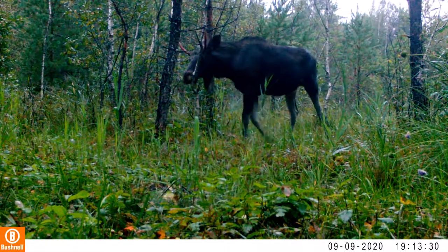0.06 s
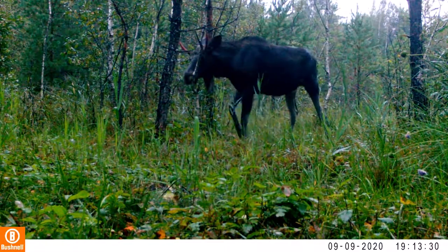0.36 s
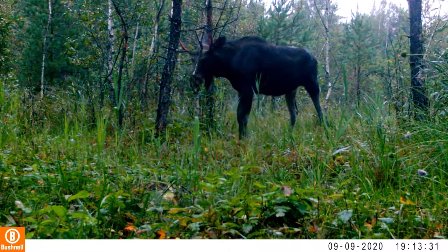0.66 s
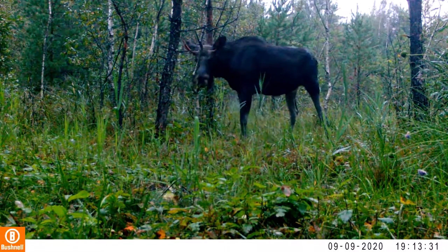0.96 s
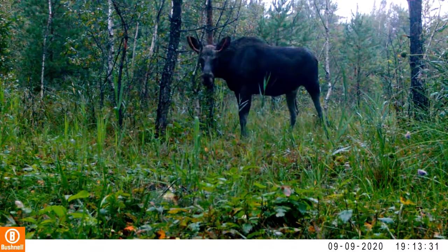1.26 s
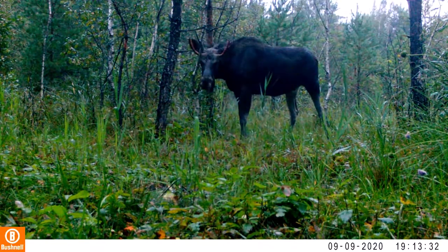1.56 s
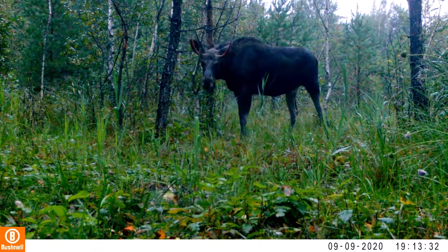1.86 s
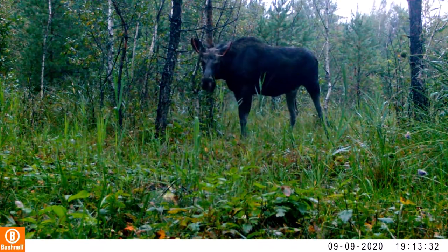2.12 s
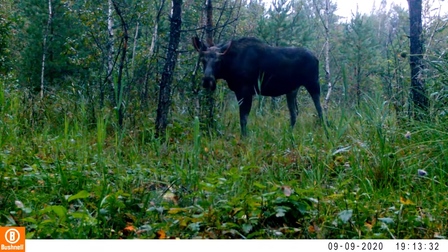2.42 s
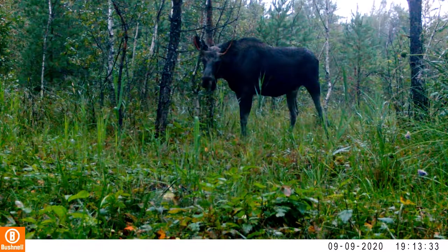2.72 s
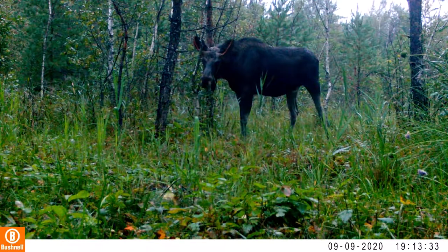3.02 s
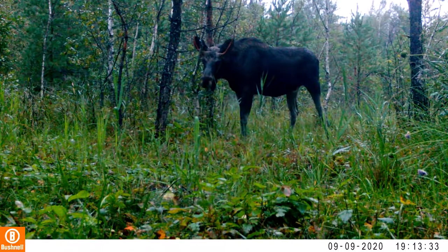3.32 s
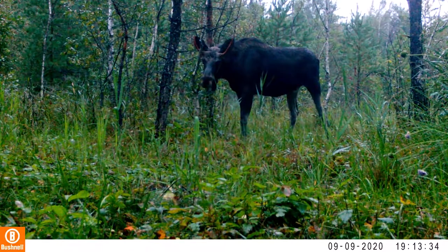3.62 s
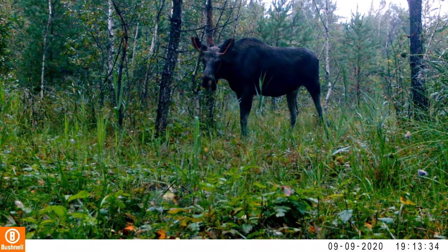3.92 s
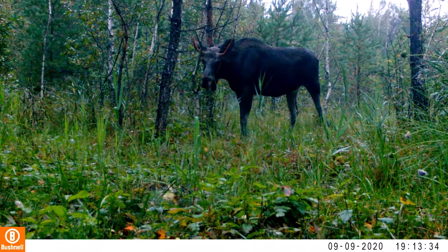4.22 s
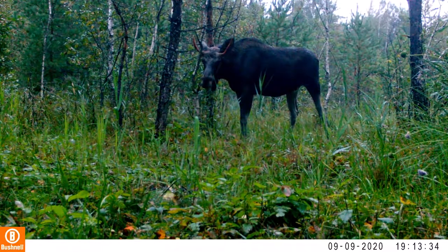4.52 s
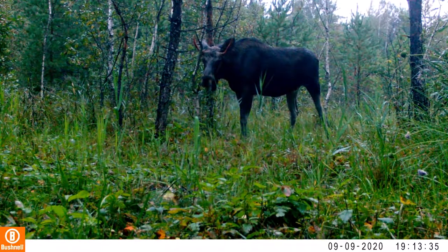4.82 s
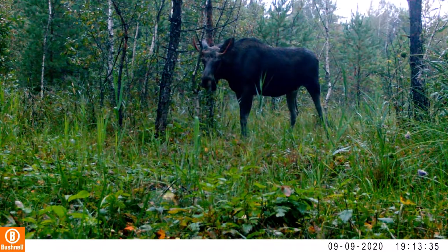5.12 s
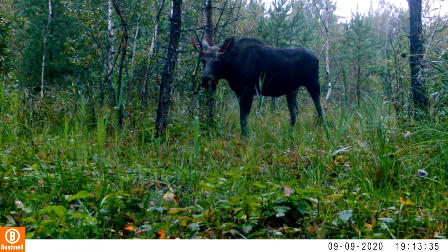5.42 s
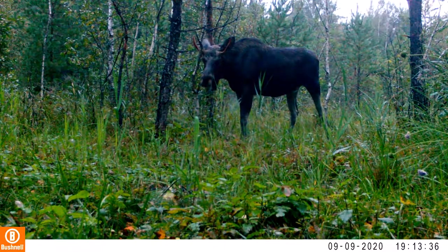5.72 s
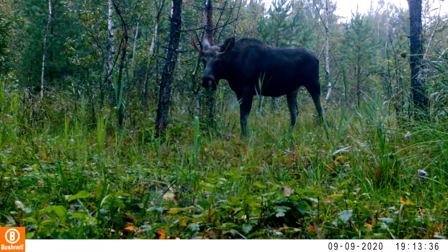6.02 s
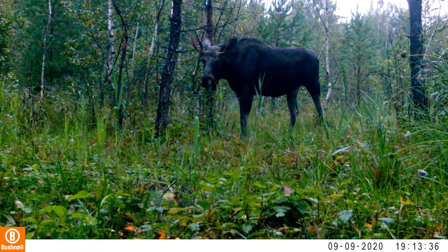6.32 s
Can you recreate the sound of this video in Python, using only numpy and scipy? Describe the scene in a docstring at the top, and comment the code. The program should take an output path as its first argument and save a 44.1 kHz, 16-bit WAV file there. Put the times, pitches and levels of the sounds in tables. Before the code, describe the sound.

Light rain falls in a forest, a soft, even hiss with a fine patter on the undergrowth. Nearer drops tick sharply and irregularly on wet leaves and bark. Now and then a drip from the branches taps the hard plastic housing around the microphone. About halfway through, one lands heavily with a loud, hollow knock that rings briefly, then the lighter ticking carries on. The sound is slightly muffled.

```python
"""A forest in light rain, heard from a small camera in a hard plastic housing.
Countless far drops blur into a bed of hiss; nearer ones patter and tick on wet leaves and bark,
each a snap, a short damped ring and a puff of spray. A few drips from the branches
land on the housing and make it ring, one of them heavily."""
import sys
import numpy as np
from scipy import signal
from scipy.fft import rfft, irfft
from scipy.io import wavfile
from scipy.ndimage import uniform_filter1d

SR = 44100
rng = np.random.default_rng(int(sys.argv[2]) if len(sys.argv) > 2 else 0)


def inscribe(sig):
    """Save sig as 16-bit PCM at rate SR to the path in sys.argv[1].

    A 1-D sig is mono; a 2-D sig holds one channel per row.
    Samples are clipped to [-1, 1] before scaling.
    """
    pcm = np.round(np.clip(np.atleast_2d(sig).T, -1, 1) * 32767)
    wavfile.write(sys.argv[1], SR, pcm.astype(np.int16))


N = 289737


def undb(db):
    """Decibels to gain."""
    return 10 ** (np.asarray(db) / 20)


def level(x, db):
    """Scale to an rms level."""
    return x * undb(db) / np.sqrt(np.mean(x ** 2))


def fade(t, t60):
    """Decay by 60 dB in t60 seconds."""
    return np.exp(-np.log(1000) * t / t60)


def ring(t, hz, t60):
    """One struck resonance."""
    return np.sin(2 * np.pi * hz * t) * fade(t, t60)


def add(track, s, sound):
    """Mix a sound into the track at s seconds."""
    i = int(s * SR)
    track[i:i + len(sound)] += sound[:N - i]


def colour(x, points):
    """EQ a sound along a curve of (frequency [Hz], gain [dB]) points."""
    hz, db = np.transpose(points)
    bins = np.maximum(np.fft.rfftfreq(N, 1 / SR), 1)
    curve_db = np.interp(np.log(bins), np.log(hz), db)
    return irfft(rfft(x) * undb(curve_db), N)


def wobble(rate_hz):
    """Random modulation at unit rms: sample-and-hold, smoothed twice."""
    hold = int(SR / rate_hz)
    steps = np.repeat(rng.standard_normal(N // hold + 1), hold)
    smooth = uniform_filter1d(uniform_filter1d(steps, hold), hold)
    return level(smooth[:N], 0)


def radiate(x, low_cut_hz):
    """Small surfaces give off almost no bass."""
    return signal.sosfilt(signal.butter(3, low_cut_hz, btype="high", fs=SR, output="sos"), x)


def far_rain(start_db=-48.5, rise_db_per_s=0.0574, flicker_db=0.68):
    """Distant drops merge into a bed of hiss that flickers a little and swells very slightly."""
    # tone of the rain over the forest floor: (frequency [Hz], gain [dB])
    spectrum = [(20, -24.5), (45, -14), (62, -14), (90, -11.5), (160, -9.5), (280, -4.5), (480, -2),
                (800, -0.5), (1300, 1.5), (2050, 0), (2700, -3), (4200, -8), (6000, -13), (9000, -9)]
    hiss = level(colour(rng.standard_normal(N), spectrum), start_db)
    swell_db = rise_db_per_s * np.arange(N) / SR
    return hiss * undb(swell_db + flicker_db * wobble(rate_hz=25))


def tick(body_db, body_hz, splash_db, splash_hz, snap_db=6, side_db=-18, spray_db=-27):
    """A drop bursts: a hard snap, a few damped cycles of the wet surface and the splash, then spray."""
    t = np.arange(SR // 50) / SR
    body = ring(t, body_hz, t60=.0057)
    snap = ring(t, hz=8500, t60=.0016)
    splash = ring(t, splash_hz, t60=.0036) - undb(snap_db) * snap
    burst = undb(body_db) * body - undb(splash_db) * splash
    # every leaf and twig has a few weaker resonances of its own
    side_hz = rng.uniform(0.78 * body_hz, 1.076 * splash_hz, size=3)
    side_rings = sum(ring(t, hz, t60=.011) for hz in side_hz)
    spray = rng.standard_normal(len(t)) * fade(t, t60=.03)
    size = np.hypot(undb(body_db), undb(splash_db))
    return burst + size * (undb(side_db) * side_rings + undb(spray_db) * spray)


def patter(count=800, far_db=-54, spread_db=6, nearest_db=-40, tilt_range_db=12):
    """Drops on the undergrowth: many faint, few near; fine ones mostly splash, big ones mostly body."""
    out = np.zeros(N)
    for when, near, leaf, pitch, fine in rng.random((count, 5)):
        db = min(far_db - spread_db * np.log(1 - near), nearest_db)
        tilt_db = tilt_range_db * (fine - .5)
        body_hz = 1500 * 2 ** (1.73 * (leaf - .5))
        splash_hz = 3800 * 2 ** (.8 * (pitch - .5))
        add(out, when * N / SR, tick(db - tilt_db, body_hz, db + tilt_db / 2, splash_hz))
    return out


def light_ticks(count=14, body_db=-40, splash_db=-35.5, tilt_range_db=9):
    """Light drops on nearby leaves, about two a second; the finer, the more splash and the less body."""
    out = np.zeros(N)
    for slot, (when, fine, leaf, pitch) in enumerate(rng.random((count, 4))):
        tilt_db = tilt_range_db * (fine - .5)
        body_hz = 1700 * 2 ** (leaf - .5)
        splash_hz = 3900 * 2 ** ((pitch - .5) / 2)
        drop = tick(body_db - tilt_db, body_hz, splash_db + tilt_db, splash_hz)
        add(out, (slot + when) / count * N / SR, drop)
    return out


def near_ticks():
    """Foreground accents: the closest drops burst sharply on wet leaves and bark."""
    # close drops: (time [s], body level [dB], body pitch [Hz], splash level [dB], splash pitch [Hz])
    drops = [ (.1955, -36.5, 2120, -30, 3420), (0.301, -35, 2300, -32, 4430),
             (0.488, -48, 1800, -33.5, 4200), (0.6977, -18.5, 2130, -18, 3850),
             (0.8505, -22, 2000, -14.5, 4550), (0.9928, -24.5, 990, -24.5, 3650),
             (1.0547, -32, 1500, -20, 2830), (1.0948, -30.5, 1170, -37, 4320),
             (1.524, -28.5, 1710, -34, 3840), (1.969, -31, 1150, -27.5, 4030),
             (2.3076, -38, 1290, -26.5, 3800), (2.452, -29, 1700, -32, 3730),
             (2.7141, -34.5, 2130, -29, 3800), (2.754, -45, 1950, -33, 4150), (3.3732, -36, 955, -35, 2850),
             (3.455, -27, 1810, -46, 3200), (3.676, -38, 1700, -31, 3370), (3.6907, -24, 1940, -20.5, 3900),
             (4.4904, -31, 1170, -33, 2500), (4.594, -29, 1710, -19, 4520),
             (4.7195, -30.5, 2500, -36, 3640), (5.0003, -30, 1130, -23, 2140),
             (5.0029, -27, 1940, -29, 4140), (5.1525, -45, 1800, -34, 5000),
             (5.194, -31.5, 1750, -42, 3200), (5.72, -39, 2110, -28.5, 4120),
             (6.1673, -27.5, 2200, -28, 4450), (6.3582, -53, 1800, -27, 5070)]
    out = np.zeros(N)
    for s, *drop in drops:
        add(out, s, tick(*drop))
    return out


def housing_drips(slap_db=3, crack_db=-15, rattle_db=-25):
    """A drip slaps the plastic shell and sets it ringing; where it lands decides which modes speak."""
    # shell resonances: (pitch [Hz], t60 [s], level when hit on top [dB], on an edge [dB], in front [dB])
    modes = [ (188, .8, -41, -40, -45), (394, .41, -25.5, -27, -27), (624, .15, -19.5, -26, -26),
             (671, .17, -20, -19, -27), (793, .26, -19, -17, -28), (1032, .055, -10.5, -19, -6),
             (1135, .048, -11.5, -19, -8), (1267, .18, -21, -23, -20), (1397, .14, -25, -24, -23),
             (1711, .18, -42, -17, -32), (1820, .17, -19, -19, -28), (1935, .15, -38, -29, -32),
             (2203, .1, -25, -26, -26), (2820, .07, -34, -28, -32), (3411, .068, -20, -32, -32),
             (4257, .075, -21, -30, -32), (5360, .05, -31, -36, -38)]
    # drips from the branches: (time [s], hit level [dB], ring relative to the hit [dB], landing spot)
    drips = [ (0.7491, -33, -4, "front"), (1.0144, -28.5, -3, "edge"), (1.1640, -36.5, 1, "edge"),
             (1.7182, -28.5, -1, "edge"), (2.455, -35, -2, "front"), (2.471, -35, 1.5, "front"),
             (2.52, -49, 6, "front"), (3.0801, -31, -6, "front"), (3.4638, -11, 5, "top"),
             (3.5752, -32, -8.5, "front"), (4.3422, -32.5, -5.5, "front"), (4.851, -27.5, -0.5, "edge"),
             (5.078, -29.5, -5, "edge")]
    out = np.zeros(N)
    t = np.arange(SR // 2) / SR
    slap = undb(slap_db) * ring(t, hz=1650, t60=.0037)
    # the drop cracks open, then many weak, well damped modes blur into a short rattle
    noise_envelope = undb(crack_db) * fade(t, t60=.03) + undb(rattle_db) * fade(t, t60=.047)
    for s, hit_db, ring_db, spot in drips:
        column = ("top", "edge", "front").index(spot)
        # neighbouring modes move in opposite directions at the microphone
        shell = sum((-1) ** k * undb(spot_db[column]) * ring(t, hz, t60)
                    for k, (hz, t60, *spot_db) in enumerate(modes))
        noise = noise_envelope * rng.standard_normal(len(t))
        add(out, s, undb(hit_db) * (slap + noise + undb(ring_db) * shell))
    return radiate(out, low_cut_hz=365)


def scene():
    """Mono mix: the bed of far rain, drops on the leaves, and drips on the housing right up close."""
    leaves = radiate(patter() + light_ticks() + near_ticks(), low_cut_hz=495)
    return (far_rain() + leaves + housing_drips())[None]


def record(dry, mic_hz=4677, leak_db=-41, hiss_db=-82, top_hz=15750):
    """A narrow-band microphone that leaks a little treble and hisses faintly; the very top is cut."""
    mic_rolloff = signal.butter(8, mic_hz, fs=SR, output="sos")
    top_cut = signal.ellip(10, .1, 80, top_hz, fs=SR, output="sos")
    hiss = undb(hiss_db) * rng.standard_normal(dry.shape)
    heard = signal.sosfilt(mic_rolloff, dry) + undb(leak_db) * dry + hiss
    return signal.sosfilt(top_cut, heard)


dry = scene()
out = record(dry)
inscribe(out)
```